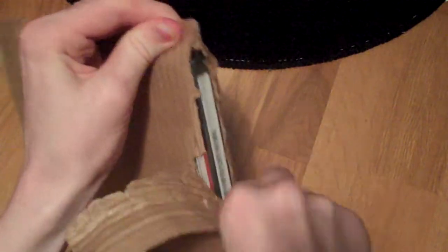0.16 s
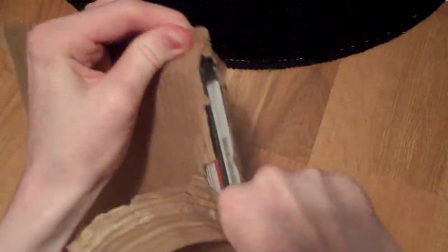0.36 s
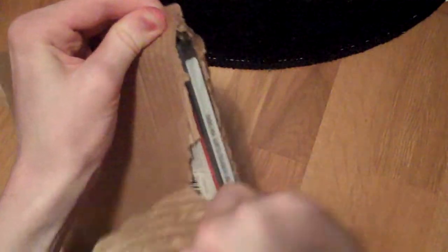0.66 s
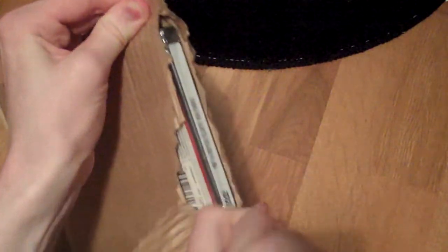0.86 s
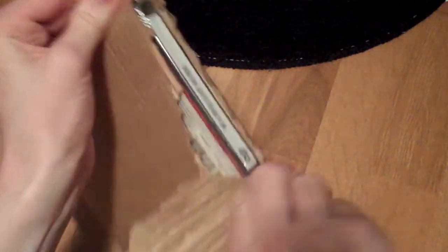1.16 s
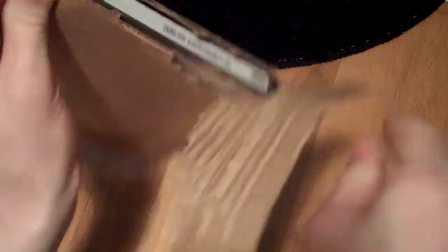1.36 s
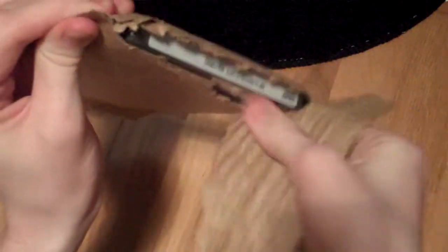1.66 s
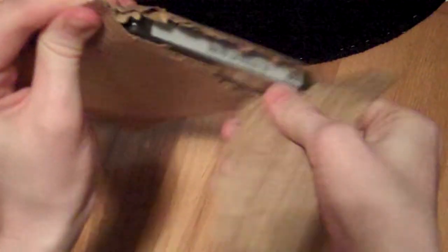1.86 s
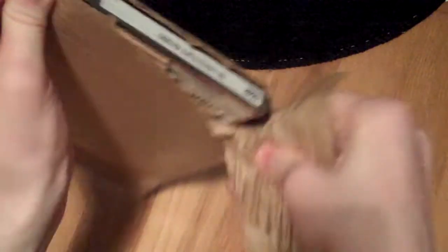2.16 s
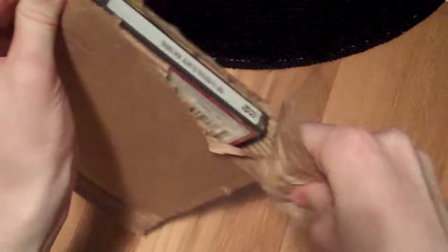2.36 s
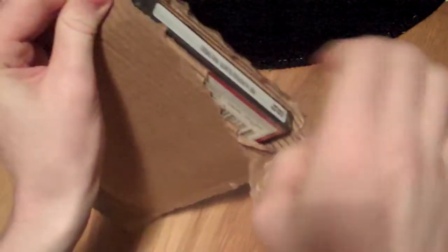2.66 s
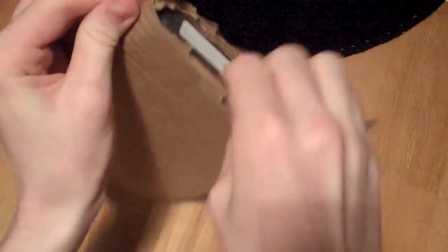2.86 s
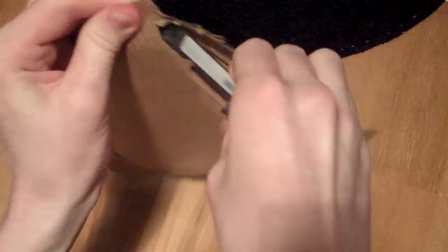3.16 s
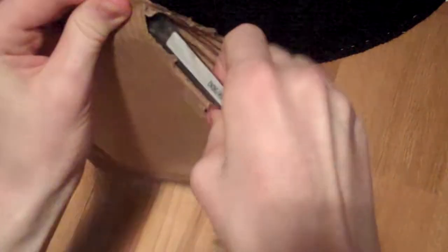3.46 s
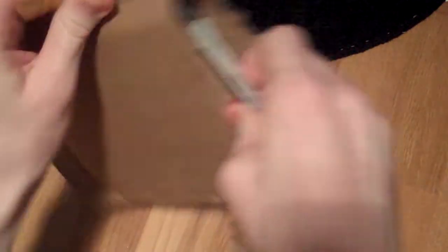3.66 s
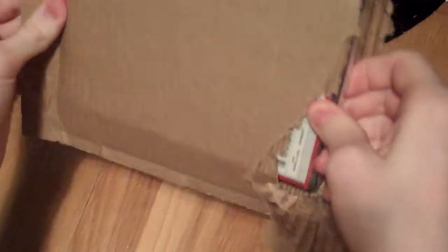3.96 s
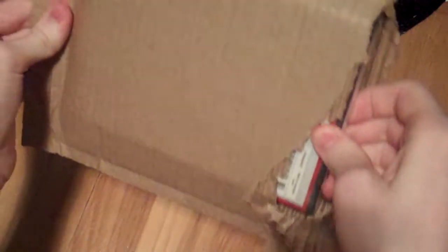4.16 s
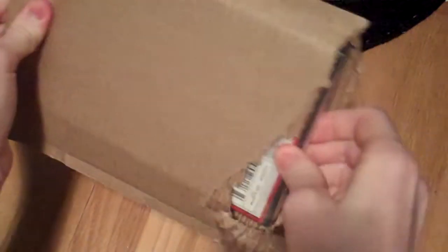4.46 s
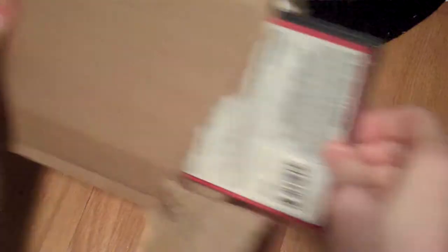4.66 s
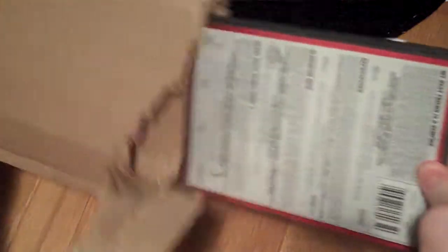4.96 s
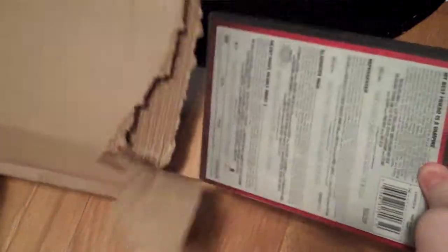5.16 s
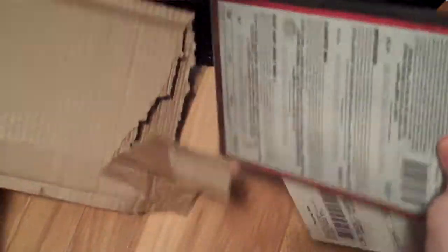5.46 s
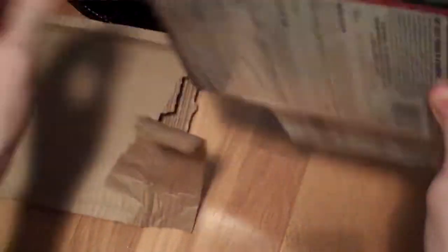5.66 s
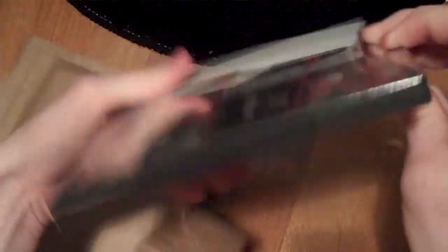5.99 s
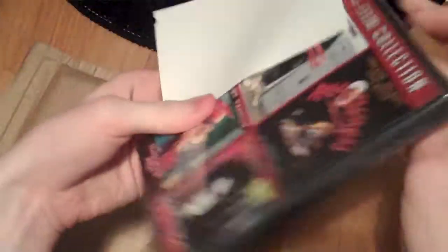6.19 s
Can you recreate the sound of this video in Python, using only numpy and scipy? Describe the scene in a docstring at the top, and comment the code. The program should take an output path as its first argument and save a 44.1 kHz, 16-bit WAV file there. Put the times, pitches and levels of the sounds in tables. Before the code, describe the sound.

A close, fairly dry indoor sound with soft hiss, low handling rumble and a barely audible hum. At 0 s a strong bright cardboard rip falls away quickly; a small crackle comes near 0.4 s, then a cluster of crisp snaps and tearing from 0.6 to 0.95 s. It thins to near quiet, with a faint tick around 1.7 s. From 1.9 to 2.4 s comes the densest ripping, bright and grainy, with many rapid snaps and small air thumps. Light rustles and faint ticks follow, with a dull knock at 2.9 s. At 3.65-4.0 s there are small taps, a bright snap and short rips, then soft rubbing. A hard, loud crack at 4.6 s starts a firm hollow scrape as the case slides out, fading by 5.2 s. Soft scuffs remain, with hollow plastic knocks around 5.6-5.7, 5.85-6.0 and 6.15 s, and a faint last one near 6.3 s.

```python
"""Hands tear a corrugated cardboard mailer close to a small camera in a quiet room, then slide a plastic case out.
Each stroke is noise, smooth or crackling, heard through bright fibres, the hollow board and a loose flap.
Glue lines and flutes snap and the case knocks: short noise bursts through resonances. Quick pulls push puffs
of air onto the microphone. Behind lie a short room answer, hiss, a faint 120 Hz hum, heard in two stretches,
and camera rumble."""
import sys
import numpy as np
from scipy import signal
from scipy.fft import rfft, irfft, next_fast_len
from scipy.io import wavfile
from scipy.ndimage import uniform_filter1d, map_coordinates

SR = 44100
rng = np.random.default_rng(int(sys.argv[2]) if len(sys.argv) > 2 else 0)


def unload_audio(sound):
    """Save the sound as a 16-bit wav file, at the path given as the first command line argument."""
    columns = np.transpose(np.atleast_2d(sound))
    # keep every value between -1 and 1, then stretch to whole-number steps
    steps = np.round(np.clip(columns, -1, 1) * 32767)
    wavfile.write(sys.argv[1], SR, steps.astype(np.int16))


N = 278932  # length in samples

# Strokes of the hands on the mailer. Each row: start of full strength in seconds, rise in ms per 20 dB,
# hold in ms, fall in ms per 20 dB (all three at least 1 ms), fibre level in dB, board rubbing level in dB,
# pitch of the loose flap in Hz, flap level in dB against the board.
HAND_STROKES = [(0.0, 12.5, 4.3, 50.5, -27.5, -39, 1725, -8.5),
                (0.202, 129.5, 108, 105.5, -60.5, -73, 1760, -17),
                (0.415, 24.5, 3.9, 251.5, -45, -56.5, 922, -3.5),
                (0.617, 121.5, 3.8, 14, -53, -64.5, 920, -7),
                (0.64, 11, 35.3, 130.5, -35, -44, 1900, -19.5), (0.766, 0, 1.9, 45, -50.5, -57.5, 1477, 6),
                (0.785, 8, 139.5, 99.5, -41.5, -50.5, 1530, -7),
                (1.166, 81, 240, 40.5, -65, -71, 964, -11.5), (1.598, 2, 43.6, 54, -53.5, -62, 2283, -1),
                (1.79, 143.5, 37, 29, -54.5, -67.5, 2210, -5),
                (1.894, 59, 44.2, 87, -47.5, -60.5, 2240, -9.5),
                (2.01, 22, 30.3, 129, -41, -49, 2490, -0.5), (2.13, 16, 66.2, 82, -29.5, -42.5, 1264, -3),
                (2.241, 8, 122.7, 74.5, -35.5, -49.5, 1924, -2.5),
                (2.41, 72, 44.4, 31.5, -50, -65, 1910, -34), (2.597, 132.5, 70.9, 55, -58.5, -66, 2146, -5),
                (2.875, 11.5, 190, 58.5, -66.5, -68, 737, -9.5),
                (3.007, 6, 4, 36.5, -79.5, -64.5, 1240, -16.5),
                (3.196, 81, 12.9, 128, -59, -63, 930, -17.5),
                (3.349, 0.5, 74, 31.5, -69.5, -63.5, 900, -22.5),
                (3.473, 26, 22.3, 70, -58, -53.5, 1152, -3),
                (3.647, 75.5, 27.3, 68, -49.5, -53.5, 1180, -15.5),
                (3.74, 8.5, 42.2, 92.5, -49.5, -62.5, 5030, 1.5),
                (3.866, 8.5, 18.4, 134, -47, -62.5, 736, -8), (3.956, 7.5, 1.94, 33.5, -41.5, -49, 744, -9),
                (4.022, 67.5, 2.9, 482, -57.5, -65, 700, -10.5),
                (4.362, 46, 14.7, 70, -52, -61.5, 960, -14.5),
                (4.541, 43.5, 30.8, 10.5, -59, -61, 943, -9.5), (4.597, 12, 3.1, 98, -34, -86.5, 750, -16),
                (4.662, 22, 67.4, 67, -36, -30.5, 791, -8.5),
                (4.791, 73.5, 14.8, 92.5, -43, -40.5, 1051, 0),
                (4.995, 115.5, 6.2, 83, -49, -42.5, 869, -10.5),
                (5.12, 29, 70.6, 25.5, -62, -62.5, 1051, 1), (5.208, 18.5, 2.9, 63, -47.5, -58, 1270, -2),
                (5.268, 60.5, 98, 206.5, -68, -55.5, 1140, -3.5),
                (5.465, 29.5, 12.3, 193, -59, -65.5, 1232, 0),
                (5.626, 4, 1.18, 48.5, -83, -35.5, 1450, -39),
                (5.717, 9, 2.9, 11.5, -72.5, -49.5, 2890, -1),
                (5.718, 54, 2.9, 202.5, -99, -61, 1420, -19.5), (5.864, 10, 3, 99.5, -58, -55, 987, 2),
                (5.9, 81, 61, 32, -53.5, -83.5, 1030, 0), (5.958, -1, 9.9, 78, -58.5, -44, 1780, -33.5),
                (6.072, 135, 70, 30.5, -56, -59, 1770, -35.5), (6.155, 8, 4.9, 25, -76, -40, 2030, -6.5),
                (6.2, 37, 3, 83.5, -67, -61, 1600, -30.5), (6.287, 57.5, 2.5, 52, -63.5, -60.5, 1600, -26)]
# Colour of the fibres, before the tilt. Each row: frequency in Hz, relative density in dB per Hz.
FIBRE_COLOUR = [(240, -53.5), (531, -29), (1570, -12.5), (2490, 6.5), (3460, 6), (11900, -5.5), (14000, -4)]
# Modes of the hollow mailer, lowest first. Each row: frequency in Hz, width in Hz, relative level in dB.
MAILER_MODES = [(287.7, 73.6, -18.5), (436, 114.6, -14.5), (838.3, 319.4, 10), (1105.4, 499, 15),
                (1477.6, 1176.7, 10), (2495, 707, -10.5)]
# Snaps of glue lines and flutes. Each row: start in seconds, peak of the crack in dB, pitch in Hz,
# board ring in dB against the crack.
GLUE_SNAPS = [(0.413, -34, 6030, -16.5), (0.5417, -38, 4350, -19), (0.61, -32.5, 4100, -14.5),
              (0.6396, -21.5, 3990, -23), (0.6524, -31, 1520, -3), (0.668, -21.5, 7000, -16),
              (0.6865, -30, 2250, -3), (0.6938, -38, 2500, -17), (0.7777, -24, 3700, -12),
              (0.8195, -25, 3600, -25.5), (0.8575, -45.5, 1580, -25), (0.8765, -22.5, 1620, -8.5),
              (0.8905, -23.5, 1590, -26), (0.9662, -30, 2280, -12.5), (1.075, -40.5, 11440, -32),
              (1.1585, -46.5, 10200, -5.5), (1.717, -32.5, 2295, -35.5), (1.9735, -42, 7500, -32.5),
              (1.9904, -24.5, 2560, -31.5), (2.0096, -15.5, 4190, -11), (2.0185, -19, 3170, -12.5),
              (2.0242, -15, 2990, -20), (2.064, -15, 3550, -12.5), (2.1318, -31, 2500, 3.5),
              (2.141, -22, 3060, -6.5), (2.1678, -19.5, 3960, -29), (2.176, -18.5, 3500, -25),
              (2.1825, -19, 3010, -16), (2.192, -20, 4000, -18), (2.2392, -20, 2080, -12),
              (2.258, -22, 3950, -12.5), (2.352, -35, 4000, -21.5), (2.537, -39.5, 2400, -3.5),
              (2.776, -59, 2270, 4.5), (2.9131, -43.5, 10400, -2.5), (3.0853, -51.5, 10500, -1),
              (3.371, -47, 3900, -24.5), (3.3973, -66, 2380, -8.5), (3.446, -45, 7340, -3.5),
              (3.4725, -39, 3220, -5.5), (3.768, -18, 4845, -53.5), (3.7798, -26.5, 8650, -37),
              (4.305, -48, 4000, -20), (4.588, -10, 5030, -7), (5.0416, -37.5, 2940, -4.5),
              (5.2055, -38, 1724, -32), (5.3493, -33, 2420, -18), (5.7587, -52, 2870, 5),
              (5.834, -41.5, 4970, -27), (6.255, -41.5, 1720, -7.5)]
# Hollow knocks of the plastic case on fingers and board. Each row: start in seconds, peak of the ring in dB,
# pitch in Hz, click and thud in dB against the ring, contact t60 in ms (at least 1 ms).
CASE_KNOCKS = [(2.872, -43, 790, -4.5, 36), (3.663, -52.5, 1100, -15, 10), (3.672, -29, 1412, -17, 10.6),
               (3.957, -31.5, 754, -11, 2.5), (5.6248, -21.5, 1200, 1, 5.4), (5.656, -28.5, 1368, -19, 8),
               (5.7, -28, 1370, -11.5, 4.3), (5.856, -25.5, 1049, -29.5, 21.7),
               (5.867, -28.5, 1035, -29, 23.4), (5.955, -24, 1360, 4, 8.6), (5.974, -25.5, 1555, -10.5, 14),
               (5.99, -34, 1194, -4, 6.5), (6.154, -24.5, 1606, -2.5, 8.8), (6.283, -42.5, 867, -8, 11.2)]
# Air pushed at the microphone. Each row: start in seconds, peak in dB.
AIR_PUFFS = [(0.66, -45.5), (2.018, -34.5), (2.133, -38.5), (2.159, -26), (2.183, -37.5), (4.591, -27.5)]
# Decay of the room. Each row: frequency in Hz, t60 in seconds.
ROOM_DECAY = [(300, 0.028), (1000, 0.198), (3000, 0.037)]
# Colour of the room's hiss. Each row: frequency in Hz, relative density in dB per Hz.
HISS_COLOUR = [(35, -44.5), (60, -22.5), (689, -8.5), (927, -2), (1020, -8.5), (14000, -31)]
# Stretches where the hum is heard. Each row: start in seconds, end in seconds.
HUM_HEARD = [(0, 1.6), (3.7, 5.9)]
# Course of the hand-held camera's rumble. Each row: time in seconds, level in dB.
CAMERA_RUMBLE = [(0.0, -83), (1.2, -89), (2.1, -76), (2.4, -87), (2.95, -80.5), (3.55, -78.5), (3.85, -79),
                 (4.15, -71.5), (4.63, -72), (6.32, -74.5)]

FLUTES_PER_S = 110  # how fast the flutes give way one after another in a rip
COLOUR_DB = 7  # bursts of crackle differ by up to this, either way, in each octave
FIRM_DB = -46.5  # level of a firm push
FLEX_DB, FLEX_GROWS = -16.5, 0.508  # panel flexing against the board; extra dB per dB beyond a firm push
TILT_DB = 3.5  # fibre brightness in dB per octave
SNAP_T60_S, SNAP_WIDTH = 0.01366, 0.18  # decay of the burst; width as a share of the pitch
BREAK_DB = 6  # the instant of breaking, over the rattle that follows
KNOCK_WIDTH, THUD_DB = 0.313, -2.5  # width as a share of the pitch; gain of the low thud beside the click
HISS_DB = -74.5
HUM_HZ, HUM_DB = 120, -85
OFFSET, TOP_HZ = -5e-4, 15030  # small constant offset in full scale; band limit


def tearing():
    """Smooth rubbing and grainy ripping excite the bright fibres, the darker board and the loose flap."""
    t, out = np.arange(N) / SR, np.zeros(N)
    grains = crackle(FLUTES_PER_S, even=6, spread_db=1.5, t60=0.0303)
    ticks = crackle(90, even=0.9957, spread_db=4.5, t60=0.014)
    smooth = rng.standard_normal(N)
    uneven = amp(1.1 * wobble(25))  # the pull is never even
    for s, *ms, fibre_db, board_db, flap_hz, flap_db in HAND_STROKES:
        rise, hold, fall = np.maximum(ms, 1) / 1000
        part = slice(max(round((s - 2 * rise) * SR), 0), round((s + hold + 2 * fall) * SR))
        fibre, body = amp([[fibre_db], [board_db]]) * swell(t[part], s, rise, hold, fall)

        # only loud bright strokes rip; a firm push slides smoothly, a light touch crackles
        ripping = 0.502 * fibre ** 2 / (fibre ** 2 + 2.4 * body ** 2 + amp(-110))
        firmness_db = max(board_db - FIRM_DB, 0)
        light = amp(-max(firmness_db, (fibre_db - FIRM_DB) / 2))
        grainy = np.clip(ripping + 0.1095 * light, 0, 1)
        rubbing = smooth[part] + 0.971 * light * ticks[part]
        drive = (np.sqrt(grainy) * grains[part] + np.sqrt(1 - grainy) * rubbing) * uneven[part]

        bright = heard(drive, lambda f: amp(along(FIBRE_COLOUR, f) + TILT_DB * np.log2((f + 1) / 5000)))
        upper = heard(drive, lambda f: board(f, low=False))
        flexing = heard(drive, lambda f: board(f, high=False) * resonance(f, 410, 780))
        dark = upper + amp(FLEX_DB + FLEX_GROWS * firmness_db) * flexing
        flap = amp(flap_db) * heard(drive, lambda f: resonance(f, flap_hz, 0.349 * flap_hz) ** 2)
        out[part] += fibre * bright + body * (dark + flap)
    return patches(out, patchy_db=0.716)


def swell(t, s, rise, hold, fall):
    """Gain of a stroke: up at a steady rate in dB, level, then down at a steady rate."""
    before, after = np.maximum(s - t, 0), np.maximum(t - s - hold, 0)
    return amp(-20 * (before / rise + after / fall))


def crackle(rate, even, spread_db, t60):
    """Decaying noise bursts, each with its own colour; the higher even, the steadier their spacing."""
    at = np.cumsum(rng.gamma(even, SR / (rate * even), 2000)).astype(int)
    size_db = spread_db * np.clip(rng.standard_normal(len(at)), -2, 2)
    noise, out = rng.laplace(size=N), 0
    inside = at < N
    for octave in range(8):
        starts = np.zeros(N)
        colour_db = rng.uniform(-COLOUR_DB, COLOUR_DB, len(at))
        starts[at[inside]] = amp(size_db + colour_db)[inside]
        envelope = signal.lfilter([1], [1, -amp(-60 / (t60 * SR))], starts)
        band = filtered(noise, lambda f: np.clip(1 - abs(np.log2(f / 125 + 1) - octave), 0, 1))
        out = out + band * envelope
    return unit(out)


def heard(drive, response):
    """The drive through a response scaled to rms gain 1 over the band."""
    gain = np.sqrt(np.mean(abs(response(np.arange(20., SR / 2, 20))) ** 2))
    return filtered(drive, response) / gain


def board(f, low=True, high=True):
    """The hollow mailer's modes, alternating in sign: the two lowest, the rest, or all."""
    total = 0
    for k, (hz, width, db) in enumerate(MAILER_MODES):
        if low if k < 2 else high:
            total = total + (-1) ** k * amp(db) * resonance(f, hz, width)
    return total


def patches(x, patchy_db):
    """Each scrap of board has its own colour: a random gain field over pitch and time."""
    z = signal.stft(x, nperseg=256)[2]
    field = uniform_filter1d(rng.standard_normal(z.shape), 5, 0)
    field = uniform_filter1d(field, 4, 1)
    return signal.istft(z * amp(patchy_db * unit(field)), nperseg=256)[1][:N]


def snaps():
    """A glue line or flute gives way: a bright crack and, with it, the ring of the mailer."""
    def crack(f, hz):
        return resonance(f, hz, SNAP_WIDTH * hz) + 0.23 * resonance(f, 2600, 7100) ** 2
    return blows(GLUE_SNAPS, np.full(len(GLUE_SNAPS), SNAP_T60_S), crack, board, BREAK_DB)


def knocks():
    """The case answers with one hollow resonance, a low thud and a broad click."""
    def hollow(f, hz):
        return resonance(f, hz, KNOCK_WIDTH * hz) * resonance(f, hz, 3150) ** 2

    def click_and_thud(f):
        return resonance(f, 1976, 2407) ** 2 + amp(THUD_DB) * resonance(f, 254.2, 160) ** 2
    contact_s = np.maximum(np.array(CASE_KNOCKS)[:, -1], 1) / 1000
    return blows(CASE_KNOCKS, contact_s, hollow, click_and_thud, lead_db=0)


def blows(table, t60s, first, second, lead_db):
    """A sharp click and a short noise burst through two responses, the first at each row's own pitch."""
    out, t = np.zeros(N + SR), np.arange(2048) / SR
    noises = rng.standard_normal((len(table), len(t)))
    for (s, db, hz, rel_db, *_), t60, noise in zip(table, t60s, noises):
        burst = noise * amp(-60 * t / t60) * (1 - np.exp(-t / 0.000043))
        burst[1] = -amp(lead_db)  # the click
        a = filtered(burst, lambda f: first(f, hz))
        b = filtered(burst, second)
        both = a / abs(a).max() + amp(rel_db) * b / abs(b).max()
        out[round(s * SR):][:len(t)] += amp(db) * both
    return out[:N]


def puffs():
    """Each puff of air is one soft pressure push that peaks 0.29 ms after its start."""
    out, u = np.zeros(N + SR), np.arange(2000) / SR / 0.00029
    for s, db in AIR_PUFFS:
        out[round(s * SR):][:len(u)] += amp(db) * u * np.exp(1 - u)
    return out[:N]


def room(x):
    """The room answers with a noise tail in which each frequency dies at its own speed."""
    hz, t, z = signal.stft(rng.standard_normal(SR // 3), SR, nperseg=256)
    decay = amp(-60 * t / along(ROOM_DECAY, hz)[:, None])
    tail = signal.istft(z * decay, SR, nperseg=256)[1]
    late = np.pad(x, (130, 0))  # samples of delay before the answer
    return signal.fftconvolve(late, tail / np.linalg.norm(tail))[:N]


def room_tone():
    """Drifting hiss, a faint hum in two stretches, a low rumble that rises and falls along its own level curve."""
    t = np.arange(N) / SR
    hiss = unit(filtered(rng.standard_normal(N), lambda f: amp(along(HISS_COLOUR, f))))
    hum = np.sin(2 * np.pi * HUM_HZ * t) * amp(HUM_DB + 3.2 * wobble(1.8))
    hum_gate = sum((t >= a) & (t < b) for a, b in HUM_HEARD) * 1.
    hum = hum * uniform_filter1d(hum_gate, SR // 10)  # fades over 0.1 s
    rumble = unit(filtered(rng.standard_normal(N), lambda f: resonance(f, 25, 440) ** 2))
    hiss_gain = amp(HISS_DB + 0.42 * wobble(1.6))
    rumble_gain = amp(np.interp(t, *np.transpose(CAMERA_RUMBLE)) + 3.4 * wobble(3.016))
    return hiss_gain * hiss + hum + rumble_gain * rumble


def amp(db):
    """Gain of a level in dB."""
    return 10 ** (np.asarray(db) / 20)


def unit(x):
    """x at rms 1."""
    return x / np.sqrt(np.mean(x ** 2) + 1e-20)


def along(points, hz):
    """Values at hz between (Hz, value) points, on a log frequency axis."""
    f, v = np.transpose(points)
    return np.interp(np.log(hz + 1), np.log(f + 1), v)


def wobble(rate):
    """A smooth random curve, rate knots a second."""
    knots = rng.standard_normal(int(N * rate / SR) + 4)
    return map_coordinates(knots, [np.arange(N) * rate / SR])


def filtered(x, response):
    """x filtered by a complex response of frequency, with zeros padded behind it."""
    m = next_fast_len(len(x) + 8192)
    return irfft(rfft(x, m) * response(np.fft.rfftfreq(m, 1 / SR)), m)[:len(x)]


def resonance(f, hz, width):
    """One causal resonance of peak gain 1."""
    return 1j * f * width / (hz * hz - f * f + 1j * f * width)


def scene():
    """Everything at the microphone: the close sources, the room's answer to them, and the background."""
    rips = tearing()
    cracks = snaps() + knocks()
    answer = amp(-16.0) * room(rips) + amp(-18.5) * room(cracks)
    return (rips + cracks + answer + puffs() + room_tone())[None]


def record(dry):
    """The treble fades out near 14 kHz, a small offset is added, and nothing passes the band limit."""
    def treble_fade(f):
        return amp(-45 / (1 + np.exp(-np.clip((f - 14000) / 90, -50, 50))))
    fading = filtered(dry[0], treble_fade)
    return filtered(fading + OFFSET, lambda f: f < TOP_HZ)[None]


dry = scene()
out = record(dry)
unload_audio(out)
```